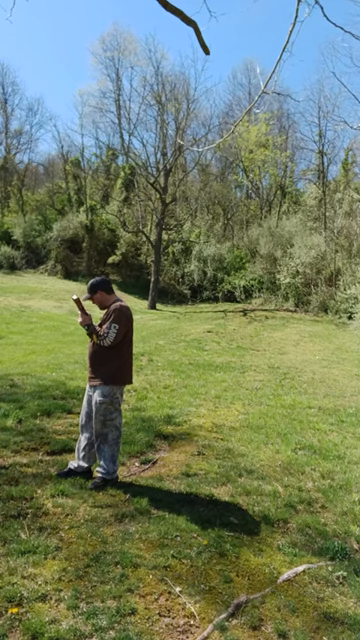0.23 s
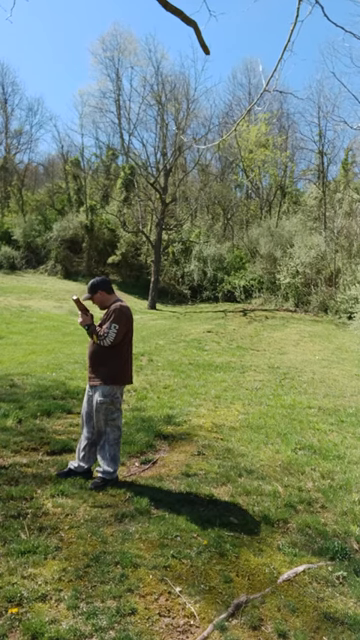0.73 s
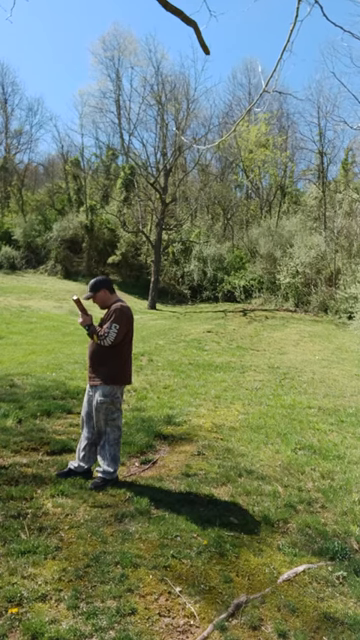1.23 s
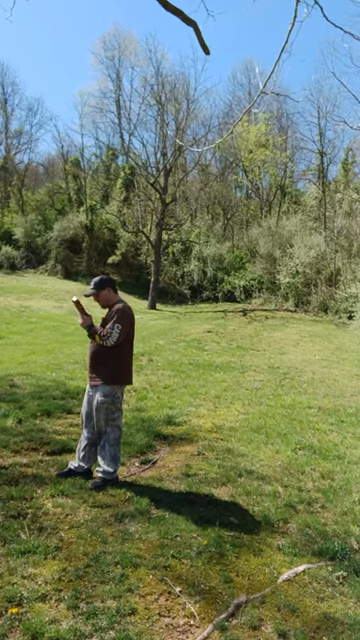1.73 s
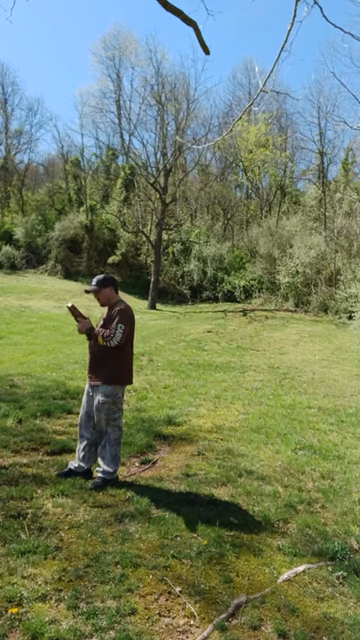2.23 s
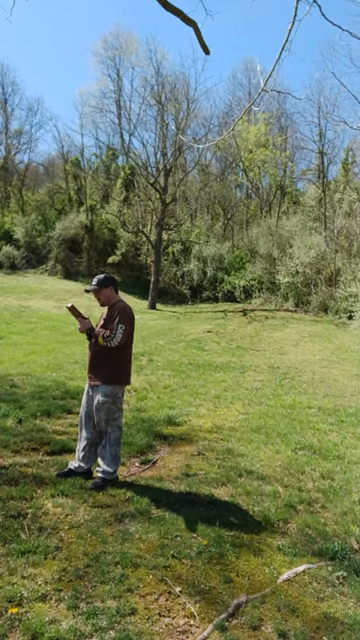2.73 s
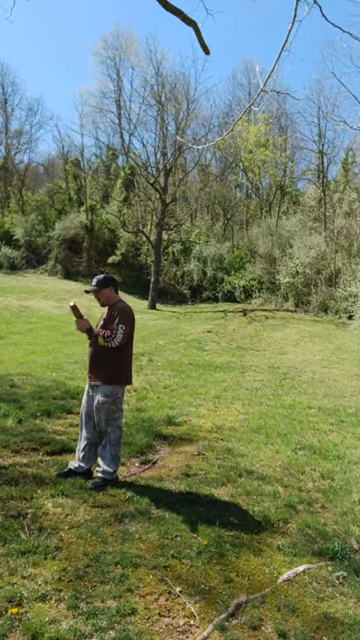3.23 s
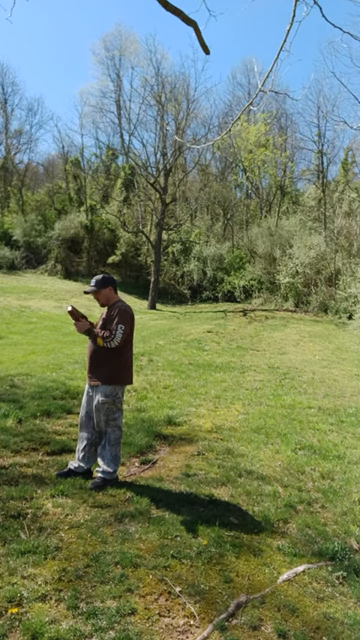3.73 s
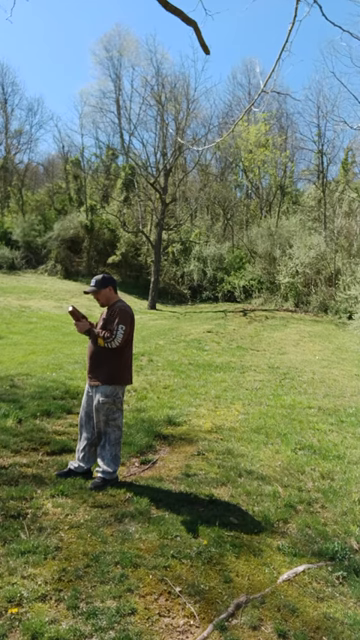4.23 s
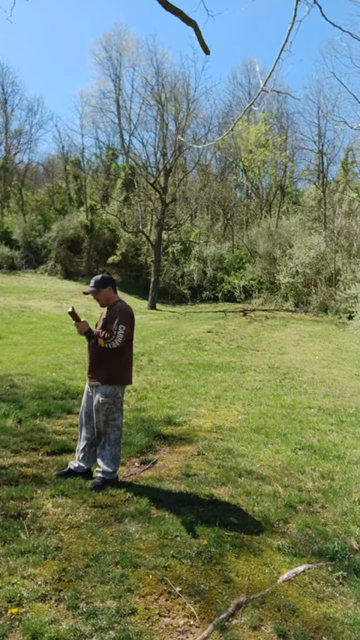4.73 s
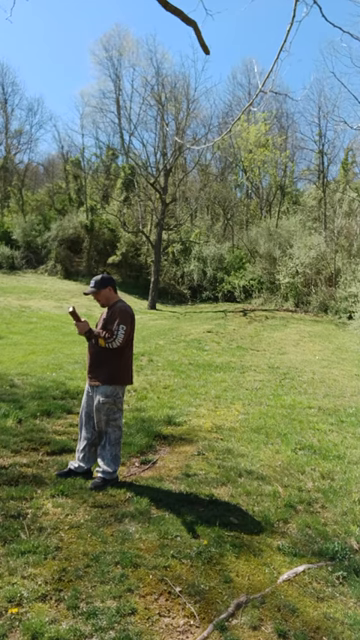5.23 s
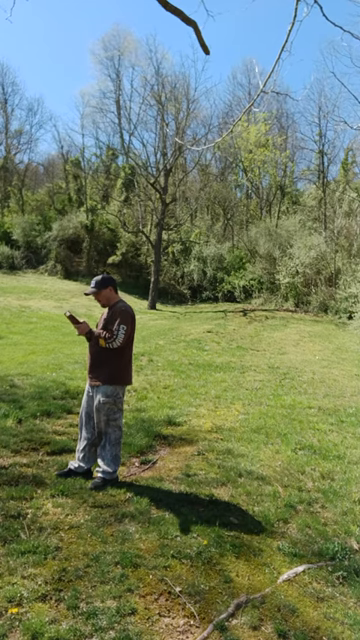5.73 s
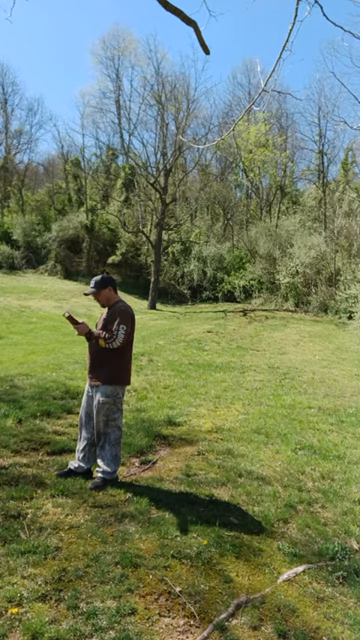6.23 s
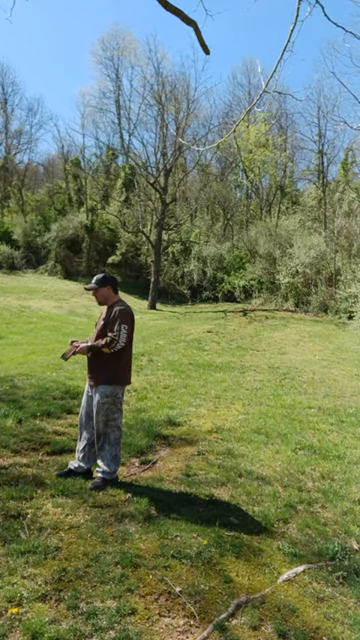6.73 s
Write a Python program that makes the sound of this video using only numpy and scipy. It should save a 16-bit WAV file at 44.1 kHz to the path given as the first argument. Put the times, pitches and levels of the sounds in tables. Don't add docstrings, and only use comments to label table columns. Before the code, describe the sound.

Outdoors on grass beside trees, a chalked lid scrapes a thin wooden box: five nasal, cracking yelps, separate short clucks, a soft fluttering judder, faint high whines, then two more clucks. Between them come high falling bird whistles, tiny chirps and a short buzzy trill. Wind rumbles low on the microphone, strongest during the purr and near the end.

```python
import sys
import numpy as np
from scipy import signal
from scipy.fft import rfft, irfft, next_fast_len
from scipy.io import wavfile
from scipy.ndimage import uniform_filter1d, map_coordinates

SR = 44100
rng = np.random.default_rng(int(sys.argv[2]) if len(sys.argv) > 2 else 0)


def elevation(decibels):
    levels = np.asarray(decibels, float)
    return 10 ** (levels / 20)


def file_out(sig):
    cols = np.atleast_2d(sig).T
    lim = np.clip(cols, -1, 1)
    pcm = np.round(lim * 32767).astype(np.int16)
    wavfile.write(sys.argv[1], SR, pcm)


N = 307818


def unit(x):
    return x / np.sqrt(np.mean(x ** 2) + 1e-20)


def along(points, hz):
    f, v = np.transpose(points)
    return np.interp(np.log(hz + 1), np.log(f + 1), v)


def curves(rows):
    s, *cols = np.transpose(rows)
    return [np.interp(np.arange(N) / SR, s, c) for c in cols]


def gated(notes):
    edge = lambda row, dt: (row[0] + dt, *row[1:-1], -110)
    return [row for note in notes for row in (edge(note[0], -.003), *note, edge(note[-1], .004))]


def wobble(rate):
    return map_coordinates(rng.standard_normal(int(N * rate / SR) + 4), [np.arange(N) * rate / SR])


def tone(hz):
    return np.sin(2 * np.pi * np.cumsum(hz) / SR)


def filtered(x, response):
    m = next_fast_len(N + SR // 2)
    return irfft(rfft(x, m) * response(np.fft.rfftfreq(m, 1 / SR)), m)[..., :N]


def noise(spectrum):
    return unit(filtered(rng.standard_normal((2, N)), lambda hz: elevation(along(spectrum, hz))))


# t/s, length/s, peak/dB, crest/share of length, rasp/0-1
YELPS = [(.114, 0.18, -20, 0.7, 0.95), (0.451, .18, -20.5, 0.79, 0.86), (.803, .16, -18.5, .45, 0.45),
         (1.153, .168, -20, 0.69, .95), (1.494, .17, -22.5, 0.7, 1)]
# first rate held/s, lowest rate after/s, lowest f/Hz, last f/Hz, tears after/s
GRIPS = [(.04, .058, 702, 784, .068), (.055, .105, 778, 778, .042), (.028, .064, 708, 860, .128),
         (.022, .062, 700, 735, .088), (.014, .039, 685, 750, .075)]
BITE_S, BITE_DB, LOCK_DB, EASE, EASE_DB, LIFT_DB = 0.0092, -13, -3, 0.903, -10.5, -29
START_HZ, KNEE_S, KNEE_HZ, HELD_HZ, REST = 930, .012, 869.4, 835.6, .5
CLEAN, GRIPPED, TEAR_S = .09, .28, .012
SWING_HZ, SAGGED_HZ, SWING_SHARE, SAGGED_SHARE, SAG_S = 1420, 1192.6, 1, 0.37, .085


def yelps():
    level, rate, rough, wall = [], [], [], []
    for (s, d, db, crest, rasp), (hold, glide, low, last, tear) in zip(YELPS, GRIPS):
        lock = min(glide, tear)
        level.append(sorted([(s, db - 78), (s + BITE_S, db + BITE_DB), (s + lock, db + LOCK_DB),
                             (s + crest * d, db), (s + EASE * d, db + EASE_DB), (s + d, db + LIFT_DB)]))
        rate += [(s, START_HZ), (s + KNEE_S, KNEE_HZ), (s + hold, HELD_HZ), (s + glide, low),
                 (s + glide + REST * (d - glide), low), (s + d, last)]
        before, after = tear - TEAR_S, tear + TEAR_S
        rough += [(s, CLEAN), (s + min(hold, tear - 2 * TEAR_S), 2 * CLEAN),
                  (s + min(glide, before) - TEAR_S / 2, GRIPPED), (s + before, GRIPPED),
                  (s + after, rasp), (s + d, rasp)]
        sag = lambda t: np.interp(t, [hold, hold + SAG_S], [SWING_HZ, SAGGED_HZ])
        wall += [(s, SWING_HZ, 0), (s + before, sag(before), 0), (s + after, sag(after), SWING_SHARE * rasp),
                 (s + max(hold + SAG_S, tear + 2 * TEAR_S), SAGGED_HZ, SAGGED_SHARE * rasp),
                 (s + d, SAGGED_HZ, SAGGED_SHARE / 2)]
    return level, rate, rough, wall


# t/s, length/s, peak/dB, first slip f/Hz, last slip f/Hz
CLUCKS = [
    (2.115, 0.024, -46, 1117, 1098),
    (2.323, 0.072, -21, 991.4, 1173),
    (2.676, 0.029, -45, 945, 947),
    (2.983, 0.064, -28.5, 945, 799),
    (5.748, .08, -22, 985, 890.6),
    (6.051, .095, -24, 1009, 836.4),
]
# t/share of length, level/dB, share of rate change, raggedness/0-1, wall f/Hz, wall share/0-1
FLICK = [(0, -56, 0, .05, 1420, 0), (0.088, -9.5, 0.07, 0.38, 1420, 0.1),
         (.17, -2.5, 0.031, 0.42, 1391, 0.5), (.3, 1, .9, 1, 1331, 0.52), (0.719, -4.5, 1, .97, 1240, .65),
         (0.999, -24.5, 0.95, 0.99, 1228, 0.71)]


def clucks():
    level, rate, rough, wall = [], [], [], []
    for s, d, db, first, last in CLUCKS:
        level.append([(s + u * d, db + drop) for u, drop, *_ in FLICK])
        rate += [(s + u * d, first + k * (last - first)) for u, _, k, *_ in FLICK]
        rough += [(s + row[0] * d, row[3]) for row in FLICK]
        wall += [(s + row[0] * d, *row[4:]) for row in FLICK] + [(s + 2 * d, SAGGED_HZ, 0)]
    return level, rate, rough, wall


# t/s, peak/dB, second harmonic f/Hz, length/s
PURR = [(3.925, -32.5, 1668, 0.023), (3.968, -29, 1689, 0.024), (4.035, -19, 1700, 0.015),
        (4.073, -19.5, 1729, 0.021), (4.1165, -21, 1725, 0.021), (4.1784, -33, 1680, 0.014),
        (4.2114, -21.5, 1705, 0.018), (4.2661, -20.5, 1706, 0.019), (4.31, -26.5, 1700, 0.014),
        (4.342, -22, 1700, 0.02), (4.3785, -25, 1667, 0.026), (4.417, -27.5, 1627, 0.032)]


def purr():
    shape = [(-.2, -22), (.04, -9), (.35, -6.5), (.7, -10), (.9, -28)]
    bend = [(-.1, .508, .45), (.3, .501, .07), (1, .494, .04)]
    level = [[(s + u * d, db + drop) for u, drop in shape] for s, db, _, d in PURR]
    rate = [(s + u * d, k * hz) for s, _, hz, d in PURR for u, k, _ in bend]
    rough = [(s + u * d, r) for s, *_, d in PURR for u, _, r in bend]
    return level, rate, rough


# t/s, length/s, peak/dB, first slip f/Hz, last slip f/Hz
WHINES = [(5.002, 0.092, -38.5, 863, 932), (5.119, 0.022, -34.5, 876, 903), (5.154, .027, -33.5, 848, 930),
          (5.185, 0.092, -28, 867, 911), (5.284, 0.016, -34, 892, 896)]
# t/share of length, level/dB
DRAG = [(0, -44), (.14, -6.5), (.68, -3), (.86, -3.5), (0.999, -18)]
DRAG_RAGGED, DRAG_FLAT = 0.064, .4


def drags():
    level, rate, rough = [], [], []
    for s, d, db, first, last in WHINES:
        level.append([(s + u * d, db + drop) for u, drop in DRAG])
        rate += [(s, first), (s + DRAG_FLAT * d, first + .15 * (last - first)), (s + d, last)]
        rough += [(s, DRAG_RAGGED), (s + d, DRAG_RAGGED)]
    return level, rate, rough


def slips(rate_hz, ragged, jitter, scatter_db, pull=0):
    at = np.interp(np.arange(1, int(np.sum(rate_hz) / SR)), np.cumsum(rate_hz) / SR, np.arange(N))
    near = at.astype(int)
    chance = rng.standard_normal((2, 16384))[:, :len(at)]
    shift = jitter * ragged[near] * chance[0] + (pull + np.zeros(N))[near]
    at = np.clip(at + shift * SR / rate_hz[near], 8, N - 9)
    taps = at.astype(int)[:, None] + np.arange(-7, 9)
    gap = taps - at[:, None]
    size = elevation(scatter_db * ragged[near] * chance[1])[:, None]
    kernel = np.sinc(gap) * np.cos(np.pi * gap / 16) ** 2 * size
    return np.bincount(taps.ravel(), kernel.ravel(), N)


# f/Hz, width/Hz, level/dB
BOX = [(748, 155, -15), (1190, 122.7, 5), (1422, 153.8, 7.5), (1815, 261, 0.5), (2740, 264, -14.5),
       (2960, 83, -8.5), (2991, 185, -8.5), (3387, 147, -11), (3845, 306, -14), (4100, 410, -17),
       (5100, 990, -20)]


def box_walls(f):
    walls = 0
    for k, (c, w, db) in enumerate(BOX):
        walls = walls + (-1) ** k * elevation(db) * 1j * f * w / (c * c - f * f + 1j * f * w)
    chalk = elevation(-69) * (f / (f + 6000)) ** 2
    return walls + chalk


# f/Hz, level/dB
LIGHT = [(850, -8), (1300, -15), (1700, 2.5), (2600, 6), (3400, 7), (4300, -7), (5300, -1.5), (7000, -4)]
# f/Hz, level/dB
RIM = [(850, 1.5), (1300, -2), (1750, 7.5), (2650, 9.5), (3500, 10.5), (4400, 8), (5300, 17.5), (7000, 7.5),
       (9000, 5.5)]


def box_call():
    yelp, cluck, judder, drag = parts = yelps(), clucks(), purr(), drags()
    rate_hz, = curves(sorted(sum((part[1] for part in parts), [])))
    ragged, = curves(sorted(sum((part[2] for part in parts), [])))
    swing_hz, share = curves(sorted(yelp[3] + cluck[3]))
    ragged = np.clip(ragged, 0, 1)
    rate_hz = rate_hz * elevation(0.149 * ragged * wobble(80))
    share = np.clip(share, 0, 1) * np.clip(6 * ragged - .4, 0, 1)
    swing_hz = swing_hz * elevation(.2 * wobble(70))
    lumps = lambda db: elevation(db * np.tanh(wobble(190)))
    lid = slips(rate_hz, ragged, jitter=.08, scatter_db=2.5, pull=.14 * share * tone(swing_hz))
    wall = slips(swing_hz, ragged, jitter=.05, scatter_db=2.5, pull=.12 * tone(rate_hz))
    drive = np.sqrt(1 - 0.2 * share) * lid + np.sqrt(share) * wall * lumps(db=3.0)
    heavy = filtered(drive, box_walls)
    light = filtered(heavy, lambda f: elevation(along(LIGHT, f)))
    thin = filtered(heavy, lambda f: elevation(along(RIM, f)))
    even = lambda x: x / np.sqrt(np.abs(uniform_filter1d(x ** 2, size=1100)) + 1e-12)
    hollow = elevation(-27.5) * tone(rate_hz)
    swing = tone(swing_hz) * lumps(db=5) + elevation(-3) * tone(2 * swing_hz - rate_hz) * lumps(db=2.5)
    hard = even(even(heavy) + .9 * share * swing) + hollow
    hard = hard * lumps(db=1.8 * ragged)
    levels = yelp[0] + cluck[0], judder[0], drag[0]
    hard_db, soft_db, thin_db = (curves(sorted(gated(notes)))[0] for notes in levels)
    call = hard * elevation(hard_db)
    call = call + even(light) * elevation(soft_db + 1.2 * wobble(60))
    call = call + even(thin) * elevation(thin_db)
    lid_ring = lambda f: 1 + 1.6 * 1j * f * 70 / (2870 ** 2 - f * f + 1j * f * 70)
    return filtered(call, lid_ring)


# f/Hz, level/dB
MIC = [(300, 32), (700, 6), (5500, 5.5), (8000, -2.5), (10500, 14.5), (13000, 7), (16000, -6)]


def microphone(call):
    return filtered(call, lambda hz: elevation(along(MIC, hz)))


def nearby(f, count, spread, db):
    delay, size = rng.uniform(.1, 1, (2, 2, count, 1))
    bounces = np.sum(size * np.exp(-2j * np.pi * f * spread * delay), axis=1)
    return 1 + elevation(db) * bounces * f / (f + 900)


# f/Hz, left lead/rad
LEAD = [(500, .1), (860, 0.61), (1200, 0.71), (1450, 2.01), (1700, 2.95), (1950, 4.8), (2100, 4.7),
        (2700, 6.95), (2900, 8.9), (3100, 12.18), (4000, 11.9), (4850, 15.1), (7500, 18.55), (16000, 37.8)]
# f/Hz, left-right/dB
PAN = [(500, 2.5), (1300, -6.5), (1490, -1), (1690, -5), (1900, -0.5), (3000, 1.5), (4200, -7),
       (10000, 1.5)]


def at_ports(call):
    half = np.array([[.5], [-.5]])
    bounces = lambda f: nearby(f, count=5, spread=.009, db=-13)
    straight = lambda f: elevation(-2.0 + half * along(PAN, f)) * np.exp(1j * half * along(LEAD, f))
    return filtered(call, lambda f: straight(f) * bounces(f))


# f/Hz, t60/s
TREES = [(500, 0.47), (1300, 0.38), (3000, 0.39), (8000, 0.49)]


def trees(x, delay):
    hz, t, z = signal.stft(rng.standard_normal((2, SR // 2)), SR, nperseg=256)
    tail = signal.istft(z * elevation(-60 * t / along(TREES, hz)[:, None]), SR, nperseg=256)[1]
    tail = tail / np.linalg.norm(tail[0])
    sway = .5 + wobble(200)
    late = np.pad(x * sway, (int(delay * SR), 0))
    return signal.fftconvolve(late[None], tail, axes=1)[:, :N]


def earlier_yelp():
    fade_db = -47.5 - 110 * np.arange(N) / SR
    return elevation(fade_db) * noise([(900, -26), (1200, 1), (1900, -3), (3000, -32)])


def whistle(notes):
    hz, db = curves(gated(notes))
    return np.sqrt(2) * elevation(db + 7.1 * np.tanh(wobble(90))) * tone(hz)


# t/share of length, level/dB
PEEP = [(0, -15), (.3, -1.5), (.55, -5.5), (1, -20)]


def peeps(rows):
    return [[(s + u * d, first + u * (last - first), db + drop) for u, drop in PEEP]
            for s, d, first, last, db in rows]


# t/s, level/dB
TRILL = [(1.93, -68), (1.964, -57), (1.984, -53), (2.102, -58), (2.11, -81)]


def trill():
    buzz = noise([(2200, -75), (2650, -5), (2850, -15), (3100, -0.5), (3600, -70)])
    beat = 1 + 0.28 * np.sin(2 * np.pi * 103 * np.arange(N) / SR)
    return elevation(curves(gated([TRILL]))[0]) * unit(beat * buzz)


# t/s, level/dB
INSECT = [(5.6, -79), (6.3, -64.5), (6.98, -64.5)]


def insect():
    pulse_db = 3.6 * np.sin(2 * np.pi * 38 * np.arange(N) / SR)
    return elevation(curves(INSECT)[0] + pulse_db) * noise([(4100, -41), (4400, -26), (4700, -56)])


# t/s, f/Hz, level/dB
HIGH = [[(s, 7750, -72), (s + .02, 7150, -63), (s + .045, 6840, -63), (s + .1, 6770, -67),
        (s + .115, 6760, -72)] for s in (1.142, 1.362, 1.764)]
# t/s, length/s, first f/Hz, last f/Hz, peak/dB
MIDDLE = [(1.452, 0.059, 4010, 3933, -45), (1.66, 0.065, 3950, 3896, -45),
          (1.864, 0.068, 3950, 3914, -44.5)]
# t/s, length/s, first f/Hz, last f/Hz, peak/dB
CHIRPS = [
    (2.228, 0.02, 5420, 4556, -51),
    (2.572, 0.064, 5400, 5360, -43.5),
    (2.652, 0.015, 5486, 4300, -52),
    (2.742, .032, 2835, 2790, -52),
]


def birds():
    singers = ((whistle(HIGH), 1, -3), (whistle(peeps(MIDDLE)), -1, 4), (whistle(peeps(CHIRPS)), 2, 0))
    song = sum(np.array([v, np.roll(v, lag) * elevation(db)]) for v, lag, db in singers)
    return song + trill() + insect()


# t/s, peak/dB, left-right/dB
GUSTS = [(0.127, -32, -3.5), (.29, -45.5, -12), (0.468, -31.5, -4), (.58, -41, 2), (0.659, -34.5, -2.5),
         (0.968, -38.5, 6), (1.18, -38, 0), (1.26, -40.5, 3), (1.52, -42, 6), (1.75, -44, -1),
         (2.08, -43, 6), (2.47, -60, 15), (3.09, -42.5, -1), (3.26, -43, -3), (3.481, -47.5, 4),
         (4.03, -39, -3), (4.201, -22.5, 1.5), (4.35, -22.5, 4), (4.431, -29, 1.5), (4.68, -51, 2),
         (4.75, -37.5, -1.5), (5.24, -43.5, -4), (5.45, -36, -3), (5.77, -37, 0), (5.87, -31, -5),
         (6.02, -41, 7), (6.1, -31.5, -1), (6.22, -32, 1.5), (6.372, -30.5, -3.5), (6.479, -24.5, -7)]
# t/s, level/dB
WIND = [(0, -45.5), (.7, -58.5), (1.6, -50), (2.2, -58.5), (2.8, -53.5), (3.2, -71), (3.6, -56), (3.9, -57),
        (4.1, -48), (4.3, -28.5), (4.6, -51.5), (5.4, -47), (6.0, -57), (6.4, -47), (6.65, -49),
        (6.98, -60.5)]
# f/Hz, density/dB per Hz
RUMBLE = [(12, -70), (20, -3.5), (59, 0.5), (76, 7), (238, -21), (296, -25.5), (329, -29.5), (500, -30.5),
          (650, -40), (1100, -120)]
# f/Hz, density/dB per Hz
HARD = [(60, 6), (150, -2), (300, -4), (700, -46.5), (1200, -65)]
RISE_DB_PER_S, FALL_DB_PER_S, LEE_DB = 242, 260, -6.5


def wind():
    s, db, pan_db = np.transpose(GUSTS)[..., None]
    since = np.arange(0, N, 64) / SR - s
    half = np.array([.5, -.5])[:, None, None]
    slope = np.where(since < 0, -RISE_DB_PER_S, FALL_DB_PER_S)
    gusts = elevation(db + half * pan_db - slope * since).sum(axis=1)
    gusts = np.repeat(gusts, 64, axis=1)[:, :N]
    breeze = elevation(curves(WIND)[0] + half[:, 0] * LEE_DB)
    ports_db = 0.83 + 20 * np.log10(gusts + breeze)
    eddy_db = ports_db - 0.5 + 7.9 * np.tanh(np.array([wobble(25), wobble(25)]))
    thumps = elevation(eddy_db) * noise(RUMBLE) + elevation(1.43 * eddy_db - 1.0) * noise(HARD)
    return filtered(thumps, lambda f: 1 / (1 + (48 / (f + 1)) ** 4))


# t/s, level/dB
AIR = [(0.0, -60.5), (0.33, -60.5), (1.22, -59.5), (1.4, -60), (2.04, -61.5), (3.95, -61), (4.22, -55),
       (4.47, -59), (6.36, -58), (6.98, -61.5)]
# f/Hz, density/dB per Hz
FIELD = [(88, -2), (150, -37), (186, -6), (291, -1), (354, -6), (555, -7), (1690, -11), (2550, -13),
         (2980, -17.5), (4240, -15), (5460, -20.5), (8560, -38.5), (10600, -23.5), (16000, -27.5)]
# f/Hz, left-right likeness/0-1
ALIKE = [(150, .5), (400, 0.89), (900, 0.75), (1500, 0.022), (4000, 0.027)]


def air():
    angle = lambda hz: np.arccos(np.clip(along(ALIKE, hz), -1, 1)) / 2
    mid, side = filtered(noise(FIELD), lambda hz: np.array([np.cos(angle(hz)), np.sin(angle(hz))]))
    return elevation(curves(AIR)[0] + 4.5 + 0.64 * wobble(5.2)) * np.array([mid + side, mid - side])


def scene():
    call = microphone(box_call())
    song = birds()
    mix = at_ports(call)
    mix = mix + elevation(-24.5) * trees(call, delay=.015)
    mix = mix + elevation(-44.5) * trees(call + np.roll(call, SR // 10), delay=0.13)
    mix = mix + earlier_yelp()
    mix = mix + song + elevation(-10) * trees(song[0], delay=0.014)
    return mix + wind() + air()


def low_pass(x):
    return signal.sosfilt(signal.butter(12, 16540, fs=SR, output="sos"), x)


def record(dry):
    mix = filtered(dry, lambda hz: hz < 15790)
    return low_pass(mix)


dry = scene()
out = record(dry)
file_out(out)
```